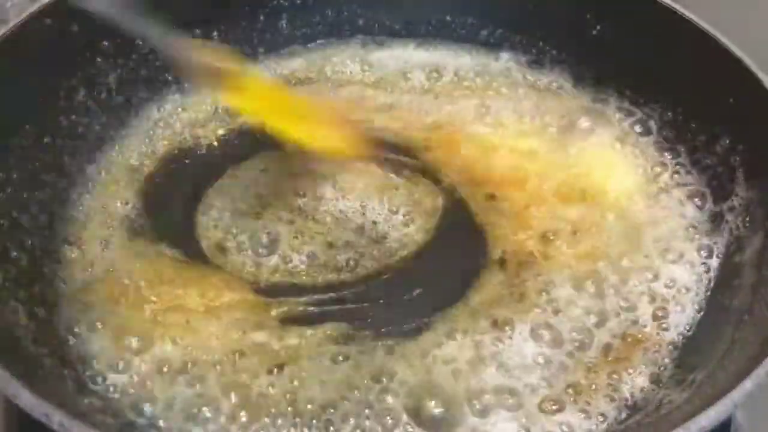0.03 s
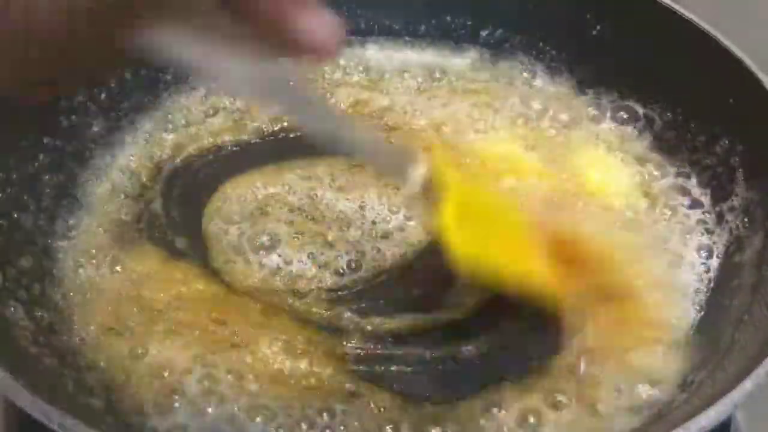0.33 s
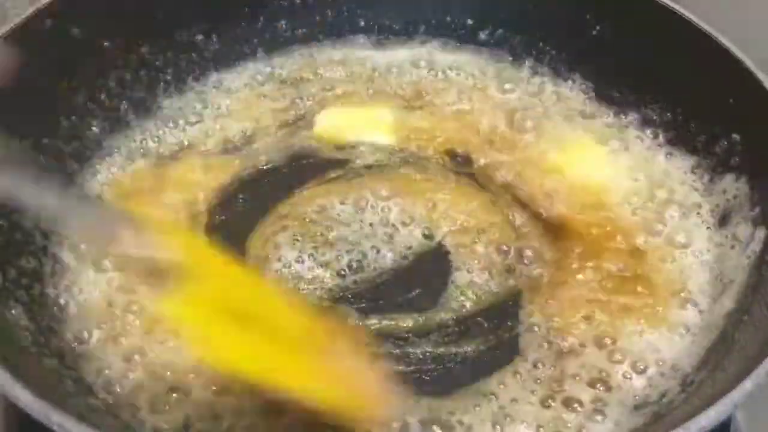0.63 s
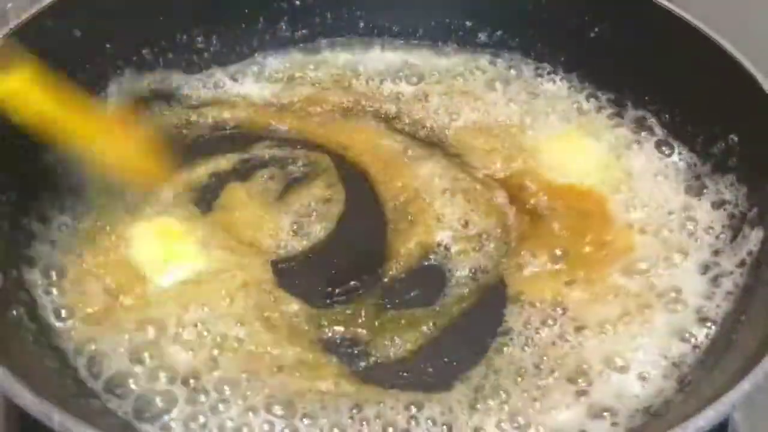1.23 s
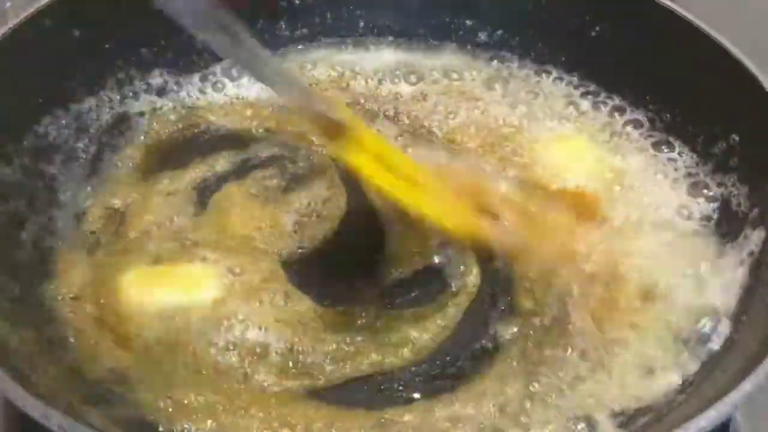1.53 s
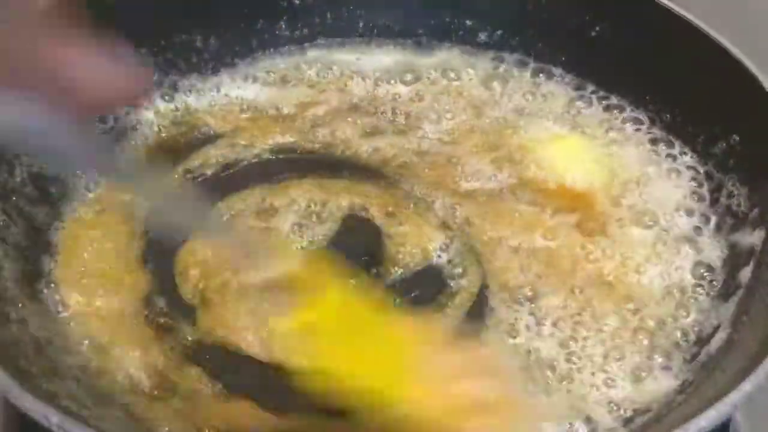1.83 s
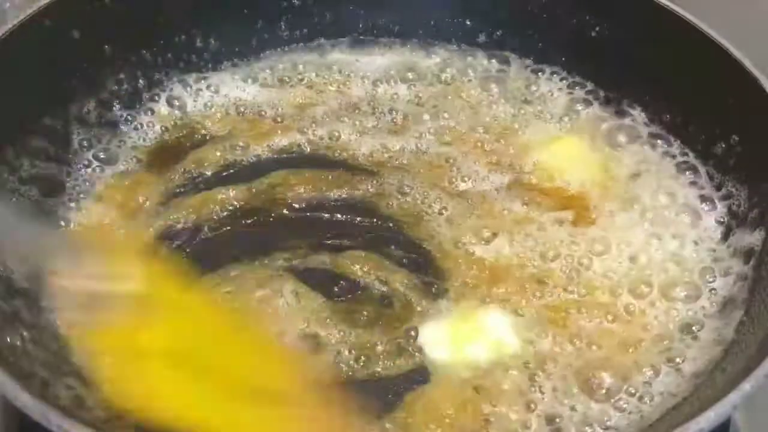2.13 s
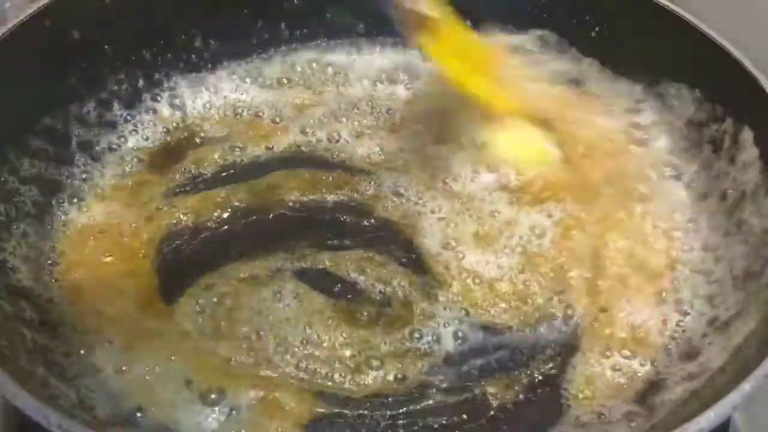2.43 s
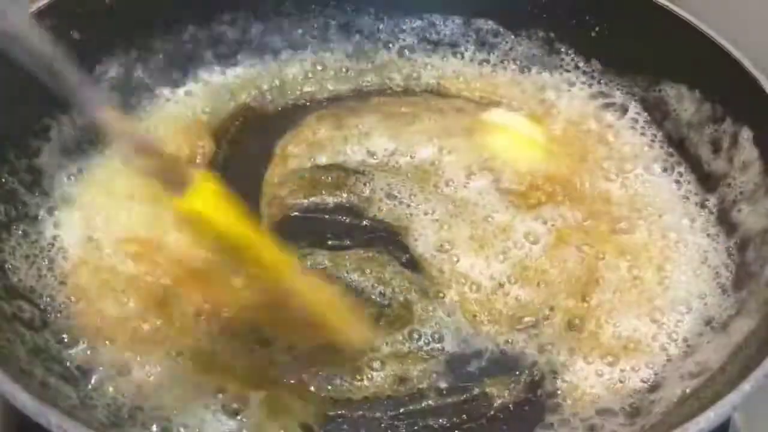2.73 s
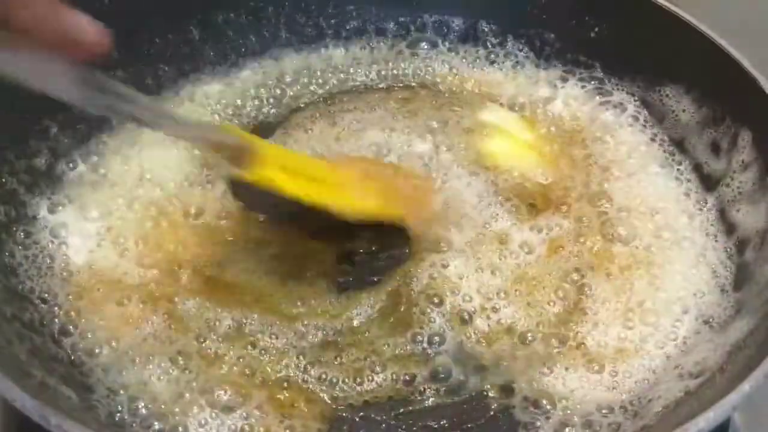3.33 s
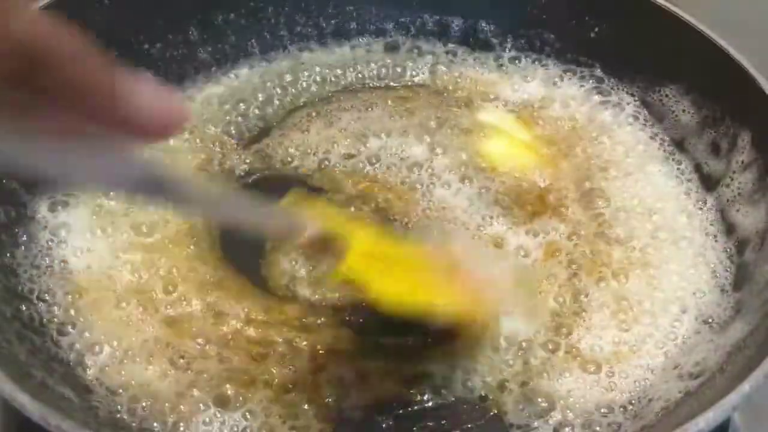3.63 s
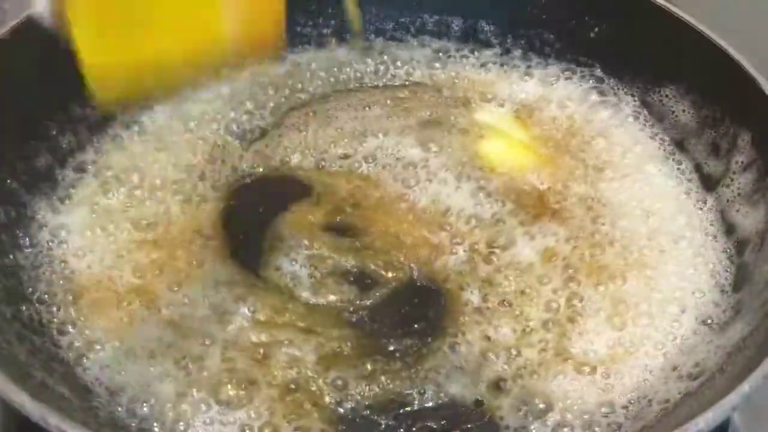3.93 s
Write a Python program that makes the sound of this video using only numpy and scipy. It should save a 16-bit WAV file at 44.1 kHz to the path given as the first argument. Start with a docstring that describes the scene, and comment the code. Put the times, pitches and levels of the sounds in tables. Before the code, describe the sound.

A close, continuous sizzle of frothing butter fills a small kitchen, swelling slightly with the stirring. Bubbles pop, fat spits now and then, and partway through a spatula lightly knocks and scrapes the pan while the stove rumbles faintly.

```python
"""Butter and caramel froth in a hot pan: countless bursting bubbles make a purr, pops, fizz and hiss.
A spatula stirs them, knocks the pan once and skids; the stove rumbles softly in a small kitchen.
Sharp spits of fat make the limiter duck and recover.
Two microphones a hand's length apart pick it up, each channel minus the delayed other."""
import sys
import numpy as np
from scipy import signal
from scipy.fft import rfft, irfft, next_fast_len
from scipy.io import wavfile
from scipy.ndimage import uniform_filter1d

SR = 44100
rng = np.random.default_rng(int(sys.argv[2]) if len(sys.argv) > 2 else 0)


def unload_audio(sound):
    """Save the sound as a 16-bit wav file, at the path given as the first command line argument."""
    columns = np.transpose(np.atleast_2d(sound))
    # keep every value between -1 and 1, then stretch to whole-number steps
    steps = np.round(np.clip(columns, -1, 1) * 32767)
    wavfile.write(sys.argv[1], SR, steps.astype(np.int16))


N = 176400
TIME_S = np.arange(N) / SR
LN_1000 = np.log(1000)   # 60 dB of decay
NEAR_MIC_ONLY = np.array([[1], [0]])


def from_db(db):
    """Decibels to gain."""
    return 10 ** (np.asarray(db) / 20)


def unit_rms(x):
    """Scale to rms 1."""
    return x / np.sqrt(np.mean(x ** 2) + 1e-20)


def at_hz(rows, hz):
    """Read a table on a log-frequency axis."""
    row_hz, values = np.transpose(rows)
    return np.interp(np.log(hz), np.log(row_hz), values)


def in_time(rows):
    """Read each column of a timed table at every sample."""
    times_s, *columns = np.transpose(rows)
    return [np.interp(TIME_S, times_s, column) for column in columns]


def butter(x, order, hz, kind):
    """Butterworth filter."""
    return signal.sosfilt(signal.butter(order, hz, kind, fs=SR, output="sos"), x)


def filtered(x, gain):
    """Apply a gain given as a function of frequency."""
    size = next_fast_len(N + 4096)
    hz = np.maximum(np.fft.rfftfreq(size, 1 / SR), 1)
    return irfft(rfft(x, size) * gain(hz), size)[..., :N]


def drift(rate_hz):
    """Random flutter around a rate; rms 1."""
    noise = rng.standard_normal(N)
    return unit_rms(filtered(noise, lambda hz: (hz / rate_hz) ** 2 / (1 + (hz / rate_hz) ** 4)))


def clicks(rows):
    """One click per row of start in seconds, level in dB."""
    out = np.zeros(N)
    for start_s, db in rows:
        out[int(start_s * SR)] += from_db(db)
    return out


def ring(x, hz, t60_s, zeros=None):
    """Resonator; with default zeros a unit click starts a decaying sine of height 1."""
    r, w = np.exp(-LN_1000 / (t60_s * SR)), 2 * np.pi * hz / SR
    return signal.lfilter(zeros or [0, np.sin(w)], [1, -2 * r * np.cos(w), r * r], x + 1e-18)


def grains(spectrum, per_s, spread_db, t60_cycles, pitch_count=22):
    """Random ringing bursts of uneven size, each with its own lag to the far microphone; rms 1."""
    starts = np.flatnonzero(rng.random(N) < per_s / SR)
    sizes = from_db(spread_db * np.minimum(rng.exponential(1, N), 4.3)) * rng.choice([-1, 1], N)
    lag_s = rng.normal(0.00006, 0.00017, N)
    lags = np.round(lag_s * SR).astype(int)
    pitch_index = rng.integers(0, pitch_count, N)[starts]
    pitches_hz = np.geomspace(spectrum[0][0], spectrum[-1][0], pitch_count)
    out = 0
    for k, hz in enumerate(pitches_hz):
        at = starts[pitch_index == k]
        kicks = np.array([np.bincount((at + lag) % N, sizes[at], N) for lag in (0, lags[at])])
        bursts = ring(kicks, hz, t60_cycles / hz, zeros=[1, 0, -1])
        out = out + unit_rms(bursts) * from_db(at_hz(spectrum, hz)) * np.sqrt(hz)
    band_hz = [pitches_hz[0] * 0.7, min(pitches_hz[-1] * 1.4, SR * 0.42)]
    return unit_rms(butter(out, 2, band_hz, "band"))


# Swell with the stirring. Each row: time in seconds, rumble offset in dB, froth offset in dB.
STIR_SWELL = [(0, -1, -1.5), (.45, 1, 1), (.8, 3, -0.5), (1.15, -2, -0.5), (1.8, -1, 0.5), (2.2, -2, -1.5),
              (2.7, -2, 2), (3.05, 0.5, 1), (3.5, -5, -1), (4, -1.5, -1.5)]
# Stove rumble. Each row: frequency in Hz, relative density in dB.
RUMBLE_SPECTRUM = [(25, -6), (60, -10), (90, -0.5), (125, 5.5), (180, -4), (260, -7.5), (450, -10.5)]


def stove(level_db=-57.5):
    """Low rumble of pan and stove, swelling with the stirring, nearly alike at both microphones."""
    stir_db, _ = in_time(STIR_SWELL)
    noise = rng.standard_normal(N) + 0.46 * rng.standard_normal((2, N))
    rumble = filtered(noise, lambda hz: from_db(at_hz(RUMBLE_SPECTRUM, hz)) / (1 + (hz / 700) ** 4))
    return from_db(level_db + stir_db) * unit_rms(rumble)


def kitchen(x, level_db=-4.5, t60_s=0.18, spot_count=5):
    """Short diffuse tail per microphone and spot of the pan; the liveliest spot wanders."""
    t = np.arange(SR // 2) / SR
    tails = rng.standard_normal((spot_count, 2, len(t))) * np.exp(-LN_1000 * t / t60_s) * (t > 0.003)
    tails /= np.sqrt(np.sum(tails ** 2, axis=2, keepdims=True))
    shares = np.array([drift(rate_hz=5) for _ in tails])
    shares /= np.sqrt(np.sum(shares ** 2, axis=0))
    reverb = sum(signal.fftconvolve(x * share, tail, axes=1)[:, :N] for share, tail in zip(shares, tails))
    return from_db(level_db) * butter(reverb, 2, 350, "high")


# Spatula contacts in one knock, then the pan rocking. Each row: start in seconds, drive in dB.
SPATULA_BLOWS = [(1.3895, -1), (1.397, -4.5), (1.415, -4.5), (1.433, -13.5)]
PAN_ROCKS = [(1.437, 3.5), (1.475, 1)]
# Pan resonances. Each row: frequency in Hz, gain in dB, T60 in seconds.
PAN_MODES = [(106, -42.5, 0.53), (171.6, -42, 0.24), (262.3, -34.5, 0.28), (298, -38, 0.12),
             (333, -38, 0.13), (890, -51.5, 0.23), (1040, -56, 0.55), (1164, -49, 0.3), (1226, -47.5, 0.42),
             (1333, -47, 0.15), (1530, -52, 0.4), (1730, -47, 0.23), (1870, -49, 0.14), (1990, -39.5, 0.16)]
# Spatula skid. Each row: frequency in Hz, relative density in dB.
SKID_SPECTRUM = [(170, 5), (280, 5), (450, -12), (700, -11), (1200, -4), (1800, 9), (2400, 5)]


def pan(drag_at_s=1.6, drag_width_s=0.046, skid_t60_s=0.38):
    """The spatula rings and rocks the pan, skids, then drags; bubbles keep the upper modes buzzing."""
    rocking = butter(clicks(PAN_ROCKS) + 1e-18, 4, 135, "low")
    buzz = from_db(-61) * butter(rng.standard_normal(N), 2, 700, "high")
    friction = butter(rng.standard_normal(N), 2, [232, 335], "band")
    drag = from_db(-39.5) * np.exp(-((TIME_S - drag_at_s) / drag_width_s) ** 2) * friction
    drive = clicks(SPATULA_BLOWS) + rocking + drag + buzz
    body = 0
    for k, (hz, db, t60_s) in enumerate(PAN_MODES):
        mic_gains = 1 + 0.045 * (-1) ** k * np.array([[1], [-1]])
        body = body + from_db(db) * ring(drive, hz, t60_s) * mic_gains
    age_s = TIME_S - SPATULA_BLOWS[0][0]
    fade = (age_s > 0) * np.exp(-LN_1000 * np.abs(age_s) / skid_t60_s)
    skid = from_db(-29.5) * fade * grains(SKID_SPECTRUM, per_s=5000, spread_db=2.5, t60_cycles=11)
    return butter(body + skid, 4, 90, "high")


# Spits of fat. Each row: start in seconds, level in dB.
FAT_SPITS = [(.9965, 2), (2.1557, 5.5), (3.1975, 2.5)]


def spits():
    """Droplets explode with a crack and a very short ring at the upper edge of hearing."""
    bursts = clicks(FAT_SPITS)
    crack = from_db(-13) * butter(bursts, 1, 3000, "high")
    return (ring(bursts, hz=19690, t60_s=0.00081) + crack) * NEAR_MIC_ONLY


# Single big bubbles. Each row: start in seconds, peak in dB, pitch in Hz.
BIG_BUBBLES = [(0.0188, -14, 3180), (0.398, -25, 4400), (0.4108, -11.5, 5600), (0.5629, -15, 3460),
               (0.588, -15.5, 3340), (0.652, -16, 4450), (0.7117, -17, 3120), (0.9201, -10.5, 3380),
               (0.9305, -23, 3250), (0.963, -20, 3330), (0.966, -17, 3550), (1.0129, -17.5, 3000),
               (1.048, -15, 3250), (1.0611, -18, 3530), (1.1155, -18, 3080), (1.245, -15.5, 3080),
               (1.3074, -15, 3520), (1.3142, -21, 4200), (1.4836, -14, 4060), (1.493, -15, 4340),
               (1.707, -16.5, 4730), (1.7246, -16, 3700), (1.7469, -12.5, 3900), (1.851, -17, 4440),
               (1.9235, -13.5, 3950), (1.9821, -13.5, 4320), (1.986, -12, 6000), (2.0066, -15, 8140),
               (2.134, -18, 4800), (2.2474, -13, 4410), (2.2888, -12, 3930), (2.4188, -14, 3800),
               (2.489, -19, 3830), (2.5724, -16.5, 4030), (2.7054, -11.5, 5800), (2.729, -12.5, 6040),
               (2.7368, -12, 7700), (2.8695, -19, 5860), (2.8948, -11, 6260), (2.977, -17, 7400),
               (3.2017, -12, 3840), (3.2586, -13, 4960), (3.2711, -17, 4600), (3.2827, -22, 4590),
               (3.7562, -16, 4630), (3.8182, -15.5, 6900), (3.848, -13, 6600), (3.8958, -17, 4480),
               (3.939, -13.5, 6230), (3.9625, -16, 3720), (3.972, -17.5, 3820)]


def big_bubbles(decay_cycles=9.6):
    """Each burst is a tone that swells and dies within a few cycles, facing the near microphone."""
    out, t = np.zeros(N + SR), np.arange(SR // 50) / SR
    for start_s, peak_db, hz in BIG_BUBBLES:
        age = t * hz * LN_1000 / decay_cycles
        envelope = from_db(peak_db) * age * np.exp(1 - age)
        start = int(start_s * SR)
        out[start:start + len(t)] += envelope * np.sin(2 * np.pi * hz * t)
    return out[:N] * NEAR_MIC_ONLY


# Boiling as the stirring exposes hot metal.
# Each row: time in seconds, then pops, fizz and hiss levels in dB before trim.
BOIL_LEVELS = [(0.0, -30.5, -31.5, -38), (0.3, -31.5, -32, -42.5), (0.6, -31, -30.4, -39),
               (0.85, -33, -34, -44.5), (1.04, -29.5, -30.5, -38.5), (1.15, -34.5, -34, -41),
               (1.36, -35, -36, -42.0), (1.5, -33, -32.5, -34), (1.75, -34.5, -32.5, -40),
               (1.87, -37.5, -34, -40), (2.0, -35, -33.5, -36.5), (2.25, -36.5, -37, -41),
               (2.66, -38, -35, -38.5), (2.74, -38.5, -29, -36.5), (2.92, -35, -31, -33),
               (3.15, -35.5, -32, -40), (3.35, -36.5, -33.5, -46), (3.65, -35.5, -34.5, -49),
               (4.0, -36, -33, -47)]
# Four bubble sizes, largest first. Each row: frequency in Hz, relative density in dB.
FROTH_SPECTRUM = [(500, -7.5), (750, -11), (1100, -3), (1500, 2), (2000, 5), (2400, -2)]
POPS_SPECTRUM = [(2500, -11.5), (2900, -4.5), (3300, 0.5), (3550, -3.5), (3850, -1.5), (4400, 3.5)]
FIZZ_SPECTRUM = [(4400, -4), (5200, 1), (6000, -1), (7000, 1.5), (8000, -2), (9500, -7.5)]
HISS_SPECTRUM = [(9500, -5), (11000, 5), (13000, 11), (14200, -17), (15800, -13.5)]


def sizzle(flurry_db=3.5, flurry_decay_s=0.0033, flutter_db=1, far_mic_db=-1.5):
    """Four sizes of bubble burst with the boil; the smaller three are shaded at the far microphone."""
    froth = grains(FROTH_SPECTRUM, per_s=2000, spread_db=2.5, t60_cycles=11.2)
    pops = grains(POPS_SPECTRUM, per_s=1400, spread_db=2.5, t60_cycles=12.5, pitch_count=24)
    fizz = grains(FIZZ_SPECTRUM, per_s=4200, spread_db=3.5, t60_cycles=13.2)
    hiss = grains(HISS_SPECTRUM, per_s=7000, spread_db=3.5, t60_cycles=2.3)
    pops_db, fizz_db, hiss_db = in_time(BOIL_LEVELS)
    _, stir_db = in_time(STIR_SWELL)
    # A big bubble sets off its neighbours: the pops briefly get louder.
    triggers = clicks([(start_s, 0) for start_s, _, _ in BIG_BUBBLES])
    flurry = signal.lfilter([1], [1, -np.exp(-1 / (flurry_decay_s * SR))], triggers)
    froth *= from_db(-48.5 + stir_db + 0.65 * (pops_db - pops_db.mean()))
    pops *= from_db(pops_db - 3 + flurry_db * flurry)
    fizz *= from_db(fizz_db - 1)
    hiss *= from_db(hiss_db + 0.5)
    flutter = from_db(flutter_db * drift(rate_hz=9.3))
    shading = from_db([[0], [far_mic_db]])
    return flutter * (froth + (pops + fizz + hiss) * shading)


def scene():
    """The pan in its kitchen, at the near and far microphones."""
    cooking = sizzle() + big_bubbles() + pan()
    return cooking + kitchen(cooking) + spits() + stove()


def limiter(x, limit_db=-6, attack_s=0.00068, release_db_per_s=7.5):
    """Peaks over the limit pull the gain down fast; it creeps back."""
    peak_db = 20 * np.log10(np.abs(x).max(axis=0) + 1e-9)
    over_db = np.maximum(peak_db - limit_db, 0)
    ramp_db = release_db_per_s * TIME_S
    cut_db = np.maximum.accumulate(over_db + ramp_db) - ramp_db
    return x * from_db(-uniform_filter1d(cut_db, int(attack_s * SR)))


# Each channel minus the delayed other microphone. Each row: frequency in Hz, share of the other channel
# subtracted.
CROSSFEED_SHARES = [(100, 0.61), (1100, 0.78), (2100, .995), (2600, .995), (3500, 0.81), (4700, 0.61),
                    (8000, 0.52), (14000, 0.33)]


def record(dry, mic_delay_s=19 / SR, cutoff_hz=15520):
    """Limiter, then each channel minus the delayed other, then a steep low-pass."""
    limited = limiter(dry)
    other = filtered(limited[::-1],
                     lambda hz: at_hz(CROSSFEED_SHARES, hz) * np.exp(-2j * np.pi * hz * mic_delay_s))
    return filtered(limited - other, lambda hz: 1 / np.sqrt(1 + (hz / cutoff_hz) ** 400))


dry = scene()
out = record(dry)
unload_audio(out)
```